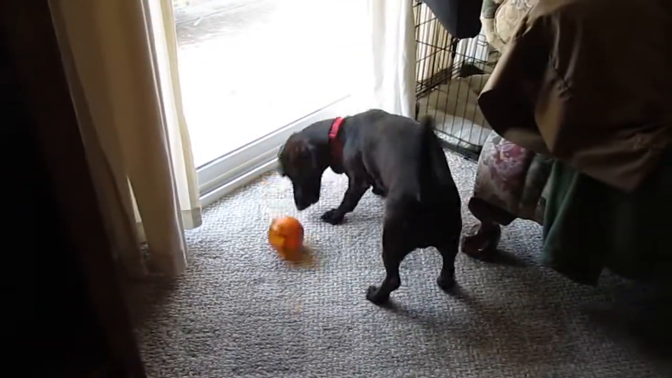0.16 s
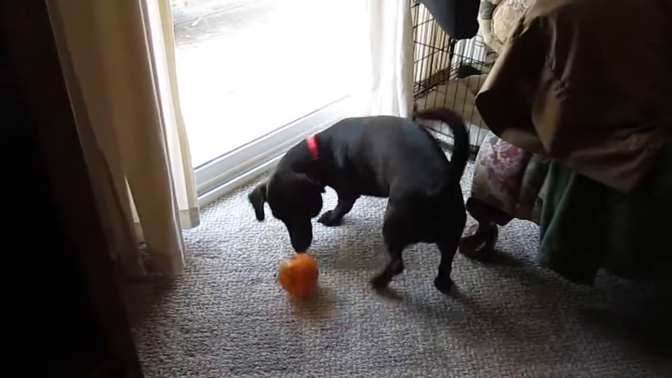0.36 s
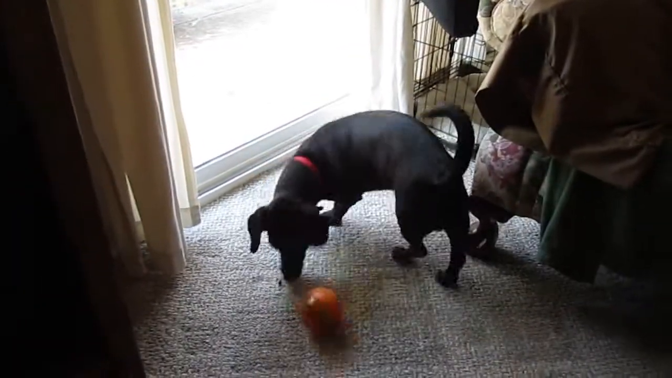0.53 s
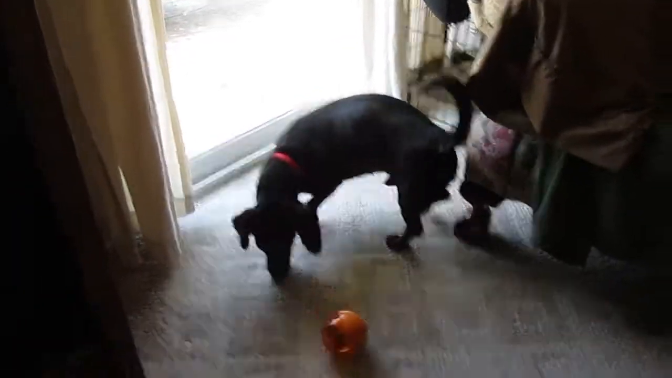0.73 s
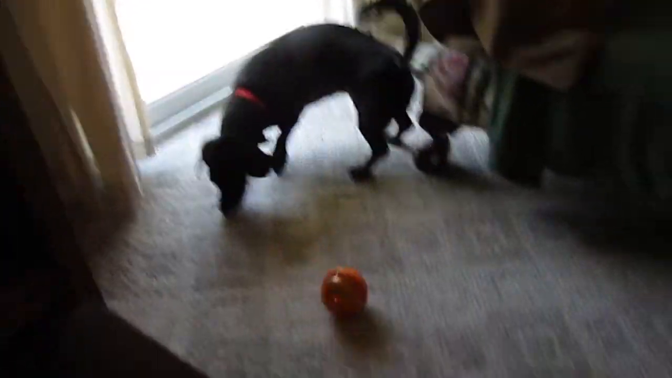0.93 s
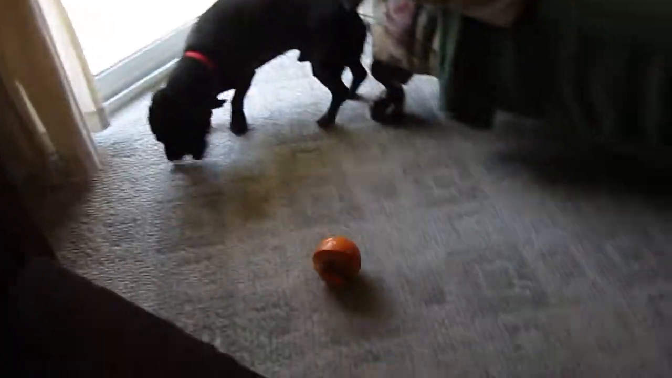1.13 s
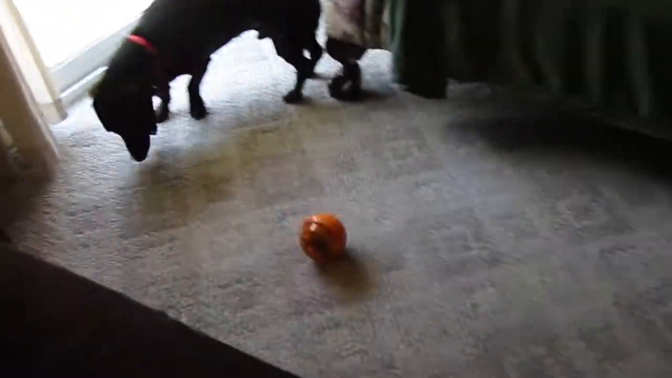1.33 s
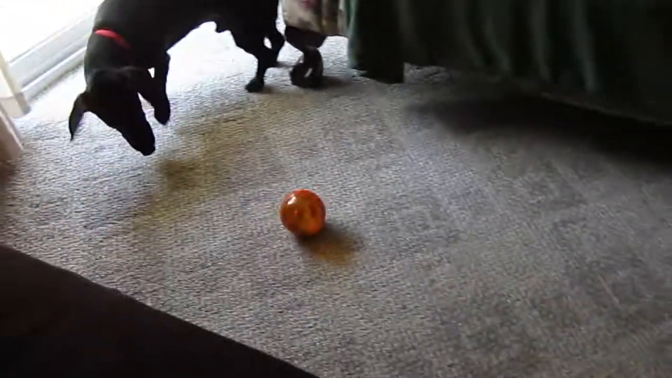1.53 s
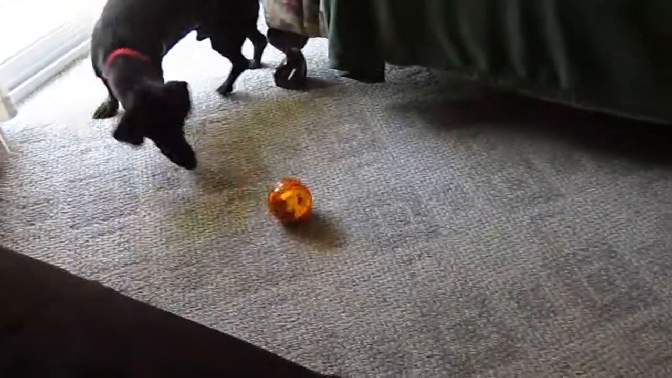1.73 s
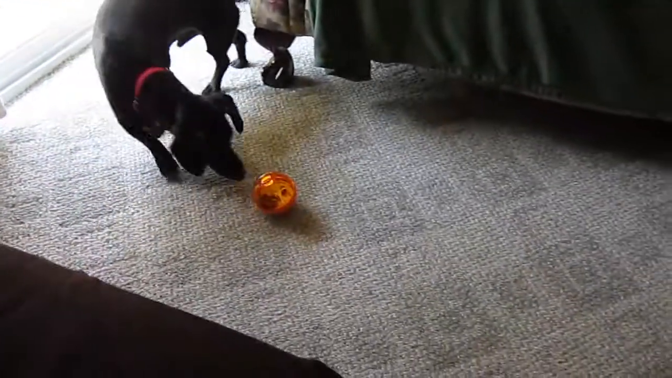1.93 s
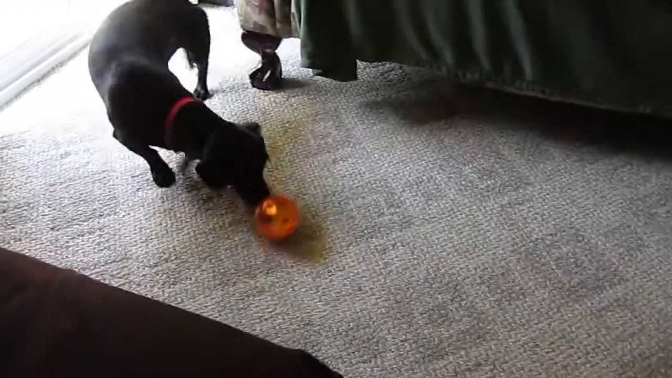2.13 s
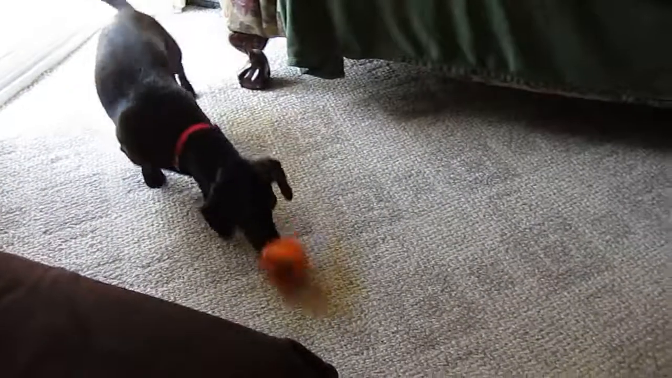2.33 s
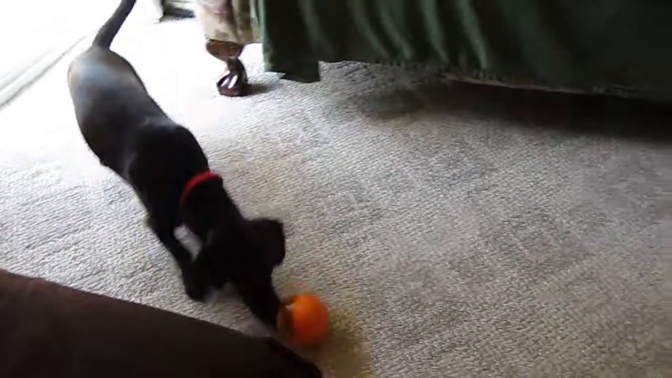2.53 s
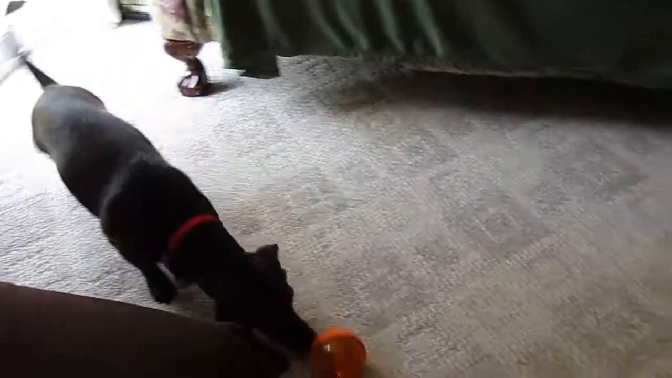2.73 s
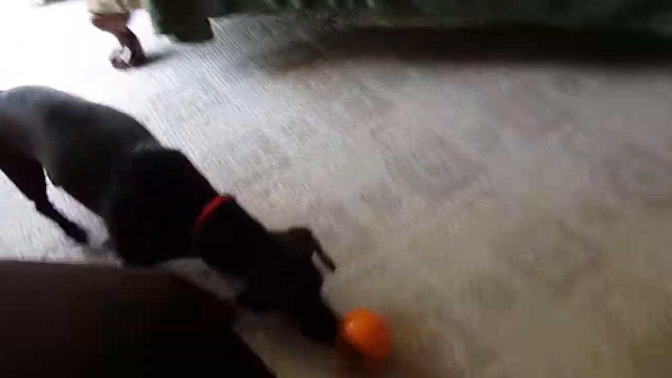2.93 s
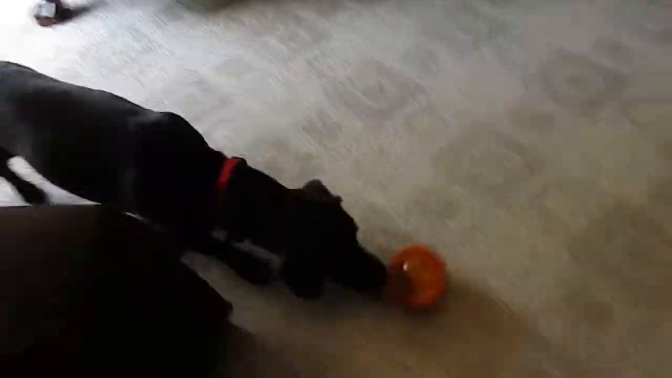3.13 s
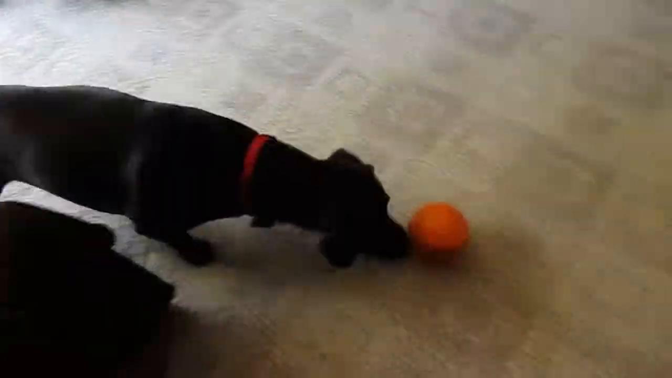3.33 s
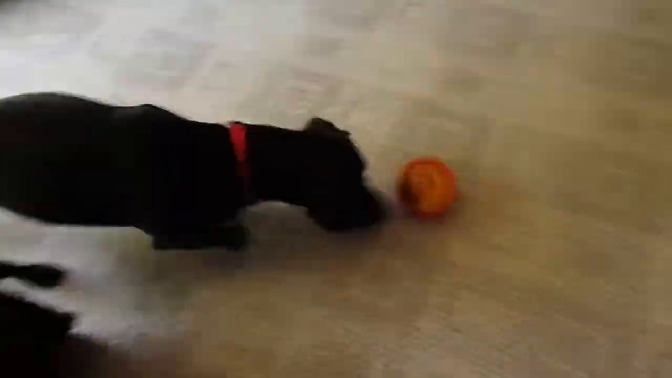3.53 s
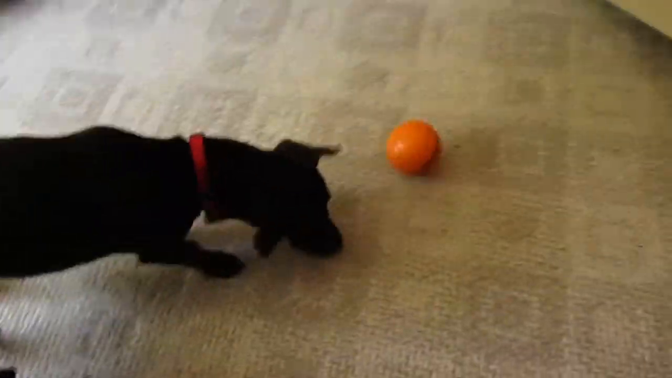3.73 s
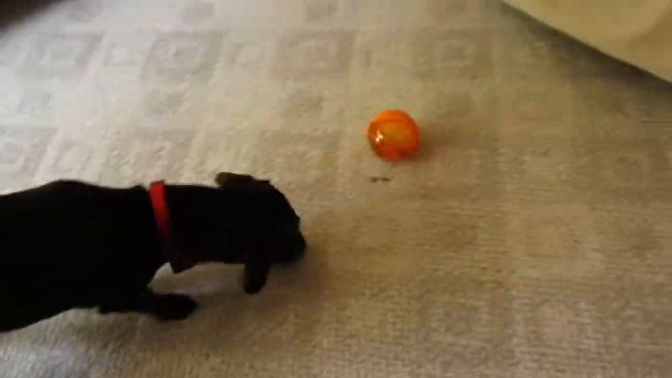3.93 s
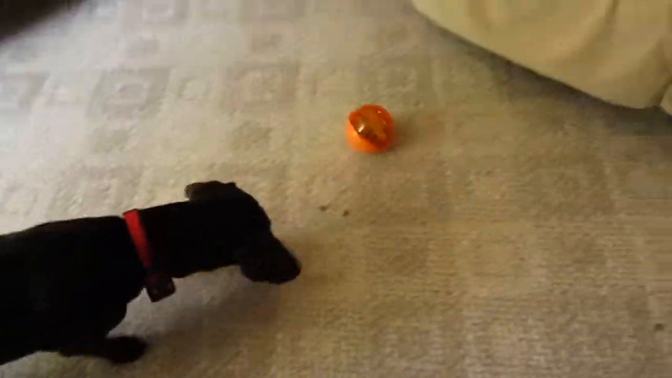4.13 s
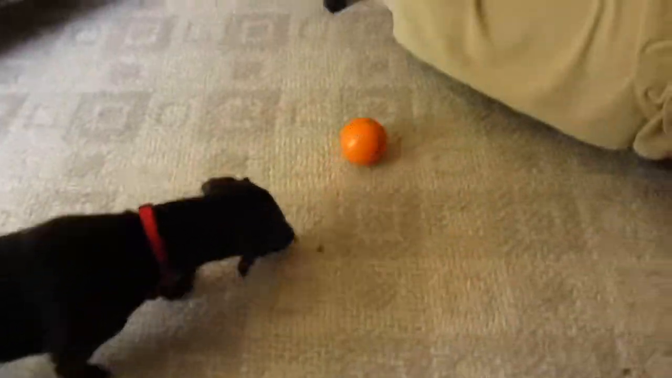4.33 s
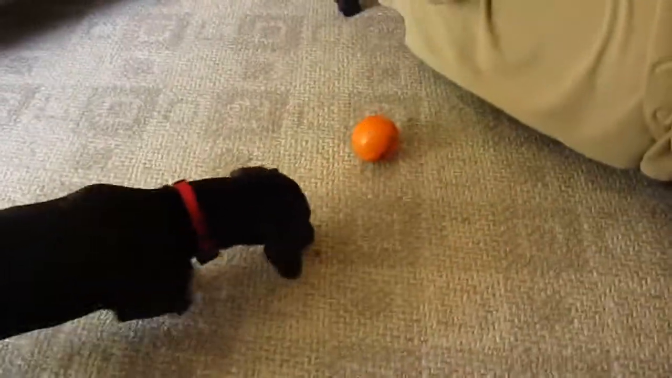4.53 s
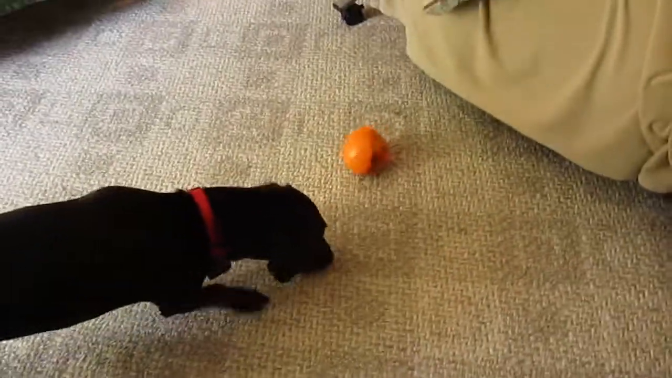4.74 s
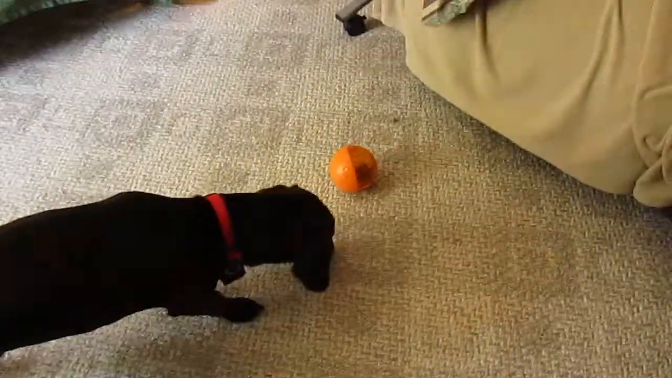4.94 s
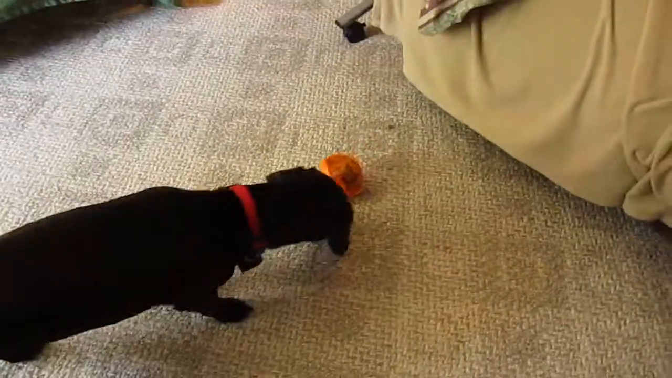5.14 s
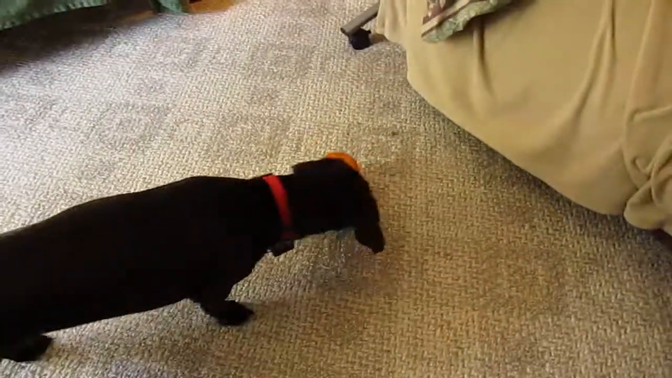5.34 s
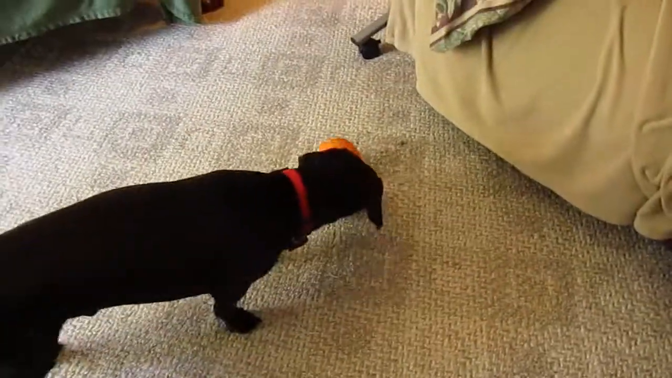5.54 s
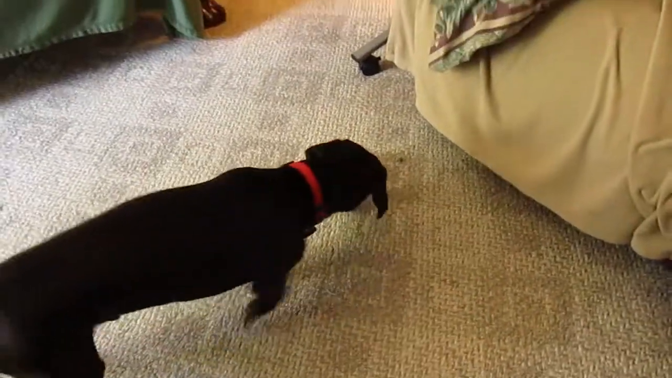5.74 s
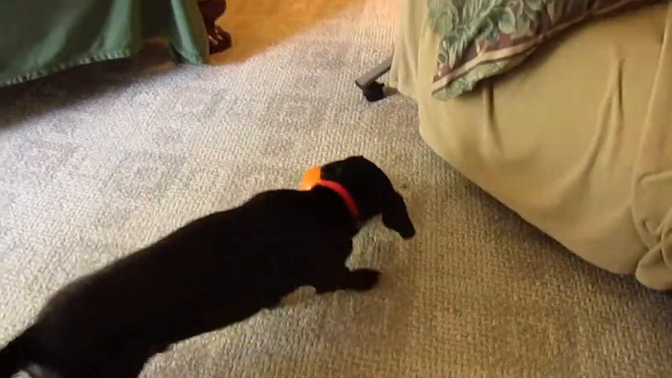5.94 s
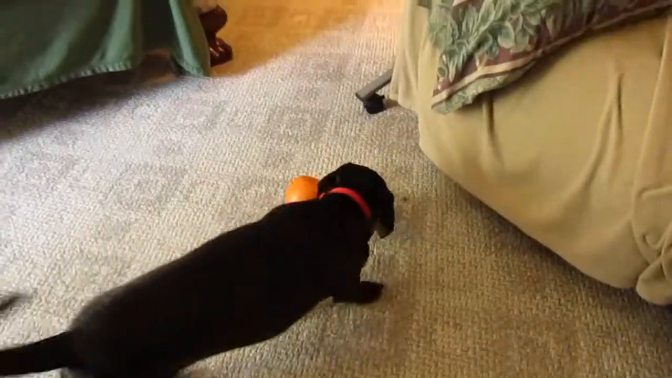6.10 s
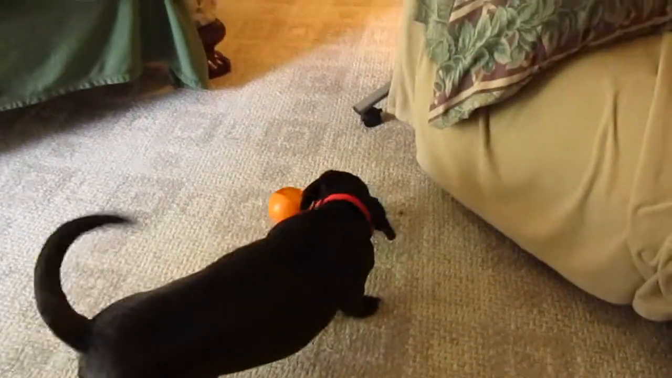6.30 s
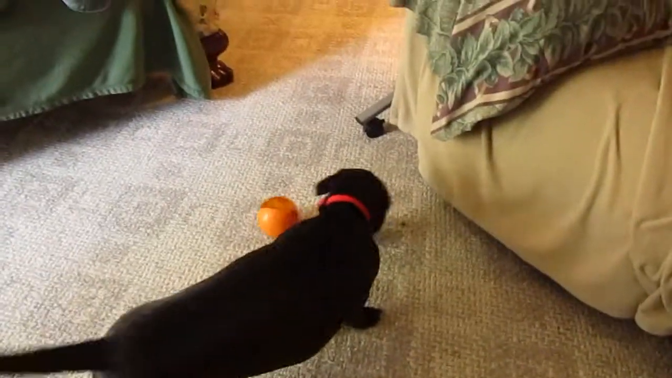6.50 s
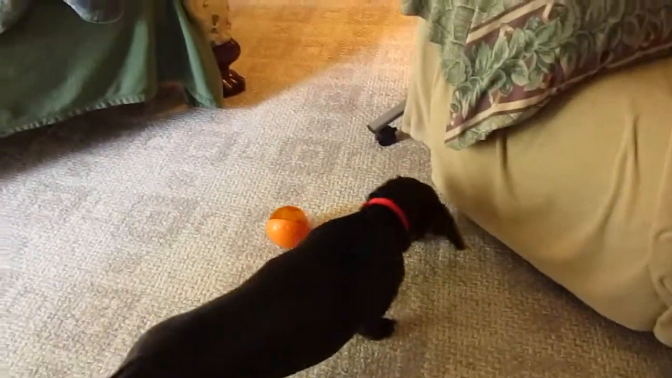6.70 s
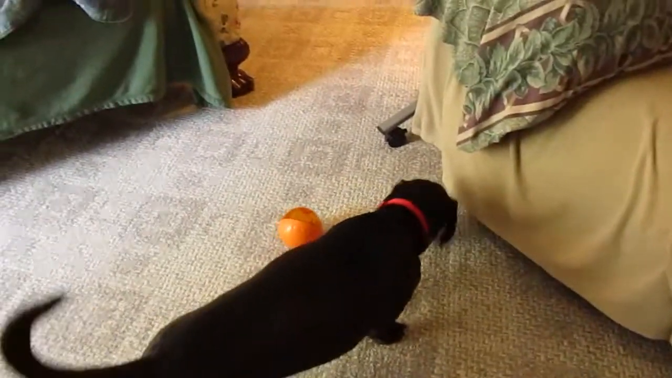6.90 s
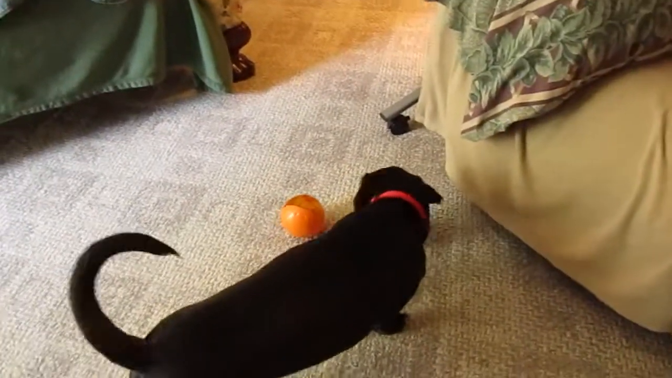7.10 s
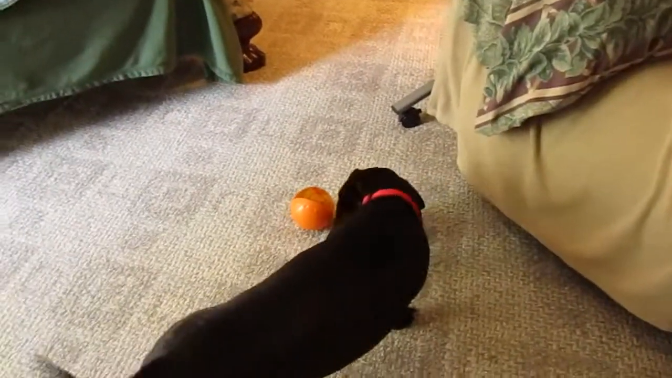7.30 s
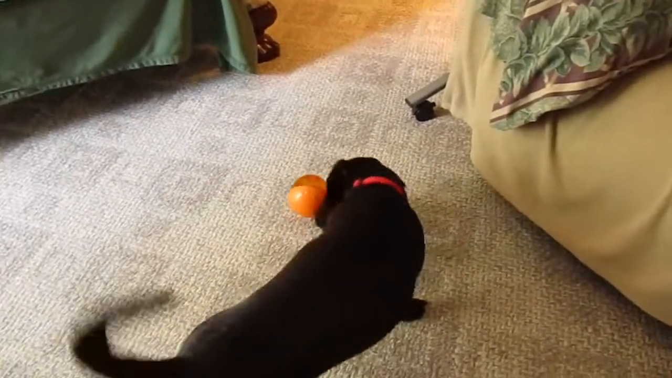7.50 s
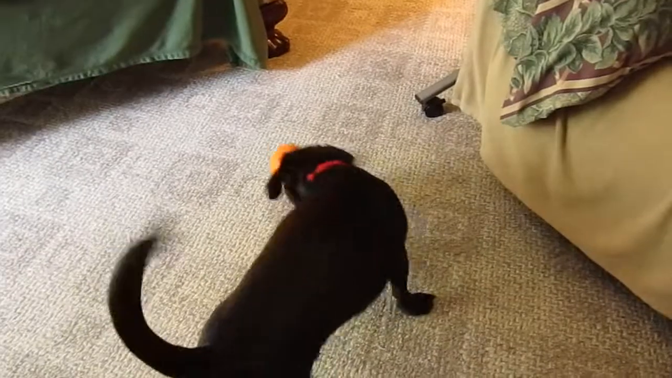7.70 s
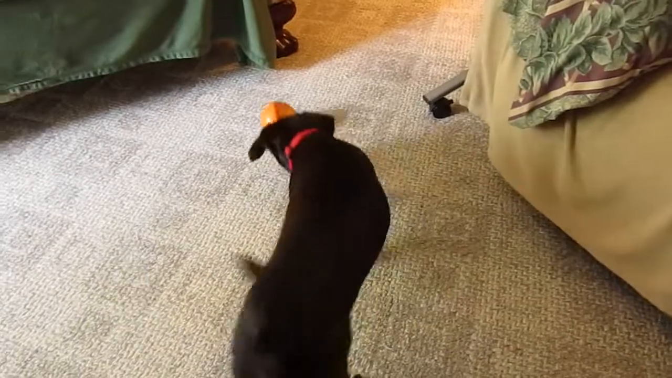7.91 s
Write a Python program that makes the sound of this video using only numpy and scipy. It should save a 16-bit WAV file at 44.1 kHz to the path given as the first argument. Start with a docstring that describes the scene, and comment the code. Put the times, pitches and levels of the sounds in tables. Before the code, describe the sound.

Dry kibble rattles and clicks inside a hollow plastic ball as a dog noses it over carpet, then quiets to faint chewing ticks.

```python
"""Dog with a treat ball

A dog noses a hollow plastic treat ball across a living-room carpet, heard from close by.
Dry kibble tumbles and clicks on the shell: showers of short noise bursts and pings at random moments.
Pushes and bumps boom softly through low ringing modes; knocks and crunches of the dog are coloured noise.
A small furnished room answers with fading noise echoes, over the low steady rush of the house."""
import sys
import numpy as np
from scipy import signal
from scipy.fft import rfft, irfft, next_fast_len
from scipy.io import wavfile
from scipy.ndimage import uniform_filter1d

SR = 44100
rng = np.random.default_rng(int(sys.argv[2]) if len(sys.argv) > 2 else 0)


def put_to_file(sound):
    """Save the sound as 16-bit audio at rate SR, in the file named by the first command-line argument."""
    columns = np.atleast_2d(sound).T  # one column per channel
    safe = np.clip(columns, -1, 1)
    whole_steps = np.round(safe * 32767)
    wavfile.write(sys.argv[1], SR, whole_steps.astype(np.int16))


N = 355446  # length of the scene [samples]
RING_TIME = np.arange(4096) / SR  # time inside one short contact sound [s]


def amp(db):
    """Turn decibels into a gain."""
    return 10 ** (np.asarray(db) / 20)


def unit(x):
    """Scale x to an rms of 1."""
    return x / np.sqrt(np.mean(x ** 2) + 1e-20)


def along(points, hz):
    """Read a curve of (frequency, value) points, with straight lines on a log frequency axis."""
    f, v = np.transpose(points)
    return np.interp(np.log(hz + 1), np.log(f), v)


def filtered(x, response):
    """Multiply the spectrum of x by a response that depends on frequency."""
    size = x.shape[-1]
    padded = next_fast_len(size + SR // 4)
    hz = np.fft.rfftfreq(padded, 1 / SR)
    return irfft(rfft(x, padded) * response(hz), padded)[..., :size]


def coloured(x, spectrum):
    """Colour a short sound with a minimum-phase filter, so that its attack stays sharp."""
    size = len(x)
    gain = amp(along(spectrum, np.fft.rfftfreq(size, 1 / SR)))
    # folding the cepstrum forward in time keeps the filter from sounding before the attack
    cepstrum = irfft(np.log(gain))
    cepstrum[1:size // 2] *= 2
    cepstrum[size // 2 + 1:] = 0
    return irfft(rfft(x) * np.exp(rfft(cepstrum)))


def fade(t60, t=RING_TIME):
    """Free decay that falls by 60 dB in t60 seconds."""
    return np.exp(-np.log(1000) * t / t60)


def burst(t60):
    """A dying puff of noise."""
    return rng.standard_normal(len(RING_TIME)) * fade(t60)


def ring(modes, spread_db, detune):
    """Damped modes, with new strengths and slightly new pitches for each point of contact."""
    total = 0
    for hz, db, t60 in modes:
        strength = amp(db + spread_db * rng.normal())
        pitch = hz * (1 + detune * rng.normal())
        total = total + strength * fade(t60) * np.sin(2 * np.pi * pitch * RING_TIME)
    return total


def add(track, s, db, sound):
    """Lay a sound into the track at a time and a peak level."""
    part = track[max(round(s * SR), 0):][:len(sound)]
    part += amp(db) * sound[:len(part)] / np.abs(sound).max()


def shower(level_db, rate, spread_db, contact, count):
    """Random contacts of uneven size on count spots, with the loudness evened out around a given level."""
    at = np.flatnonzero(rng.random(N) < rate / SR)
    loudness = amp(spread_db * np.clip(rng.standard_normal(N)[at], -2, 2))
    sizes = loudness * rng.choice([-1, 1], N)[at]
    spots = rng.integers(count, size=N)[at]
    grains = np.zeros(N)
    for spot in range(count):
        hits = np.bincount(at, sizes * (spots == spot), N)
        grains += signal.oaconvolve(hits, unit(contact()))[:N]
    grains = unit(grains)
    # neighbouring contacts share the energy of the motion
    power = uniform_filter1d(uniform_filter1d(grains ** 2, size=1800), size=1800)
    return amp(level_db) * grains / np.sqrt(np.abs(power) + 0.013)


def strokes(rows, rise_db_per_s, fall_db_per_s):
    """Level curve in dB of (start, length, level) movements: each swells, holds and dies away."""
    t = np.arange(N) / SR
    level = np.full(N, -90.0)
    for s, length, db in rows:
        rise = rise_db_per_s * np.maximum(s - t, 0)
        fall = fall_db_per_s * np.maximum(t - s - length, 0)
        level = np.maximum(level, db - rise - fall)
    return level


def stereo(pair, side):
    """Spread two unrelated noises as left and right: one is shared, the other is their difference."""
    difference = filtered(pair[1], lambda hz: amp(along(side, hz)))
    return np.array([pair[0] + difference, pair[0] - difference])


# colour of the house's background: (frequency [Hz], level [dB per Hz])
HOUSE_COLOUR = [(25, -20.5), (60, -11.5), (100, -4), (200, 0.5), (300, -2.5), (450, -11), (700, -14.5),
                (1200, -18), (3000, -28), (3900, -35), (5300, -29.5), (8000, -38.5), (15000, -62)]
# how wide that background is: (frequency [Hz], side against middle [dB])
HOUSE_WIDTH = [(40, 2.5), (150, -3.5), (400, 2), (1200, -1), (5000, -3), (12000, 2)]


def hum():
    """The steady low rush of the house: coloured noise."""
    noise = filtered(rng.standard_normal((2, N)), lambda hz: amp(along(HOUSE_COLOUR, hz)))
    return amp(-42.0) * unit(stereo(noise, HOUSE_WIDTH))


# how long the room rings: (frequency [Hz], time to fall by 60 dB [s])
ROOM_DECAY = [(200, 0.26), (1200, 0.2), (5000, 0.13), (12000, 0.07)]
# how wide the echoes are: (frequency [Hz], side against middle [dB])
ROOM_WIDTH = [(250, -20.5), (600, -9.5), (1200, -33), (2500, -45), (5000, -4.5), (8000, -2.5), (13000, 5.5)]


def room_tail():
    """Diffuse reflections as fading noise; the treble dies first in carpet and curtains."""
    hz, t, z = signal.stft(rng.standard_normal((2, SR // 3)), SR, nperseg=256)
    decay = fade(along(ROOM_DECAY, hz)[:, None], t)
    tail = signal.istft(z * decay, SR, nperseg=256)[1]
    # the echoes build up over the first few milliseconds
    tail = tail * (1 - fade(0.0064, np.arange(tail.shape[1]) / SR))
    return stereo(tail / np.linalg.norm(tail[0]), ROOM_WIDTH)


def room(x, count):
    """The room's answer; its reflections change at each of count places along the ball's path."""
    wet = np.zeros((2, N + SR))
    for at in np.array_split(np.arange(N), count):
        answer = signal.fftconvolve(x[at][None], room_tail(), axes=1)
        wet[:, at[0]:at[0] + answer.shape[1]] += answer
    # one clear echo, 0.01 s late
    near_wall = filtered(x, lambda hz: np.exp(-2j * np.pi * hz * 0.01))
    return amp(-6.5) * wet[:, :N] + amp(-17.5) * near_wall


CHEW_START_S, CHEW_END_S = 4.5, 7.7  # the dog eats what has fallen out
CHEW_PER_S, CHEW_DB, CHEW_SPREAD_DB = 11, -42, 6.5  # average rate, typical peak level and its scatter
CHEW_TRIES = 80  # possible ticks, of which a random share sounds
# colour of small ticks of teeth and crumbs: (frequency [Hz], level [dB per Hz])
CRUMB_COLOUR = [(200, -23), (800, 2), (1300, -2), (3000, -2), (4000, -14), (5500, -9), (9000, -15),
                (12000, -24), (15000, -42)]


def chewing():
    """Faint ticks of teeth and crumbs, short noise puffs at random moments while the dog eats."""
    track = np.zeros(N)
    length = CHEW_END_S - CHEW_START_S
    for place, keep, size in np.c_[rng.random((CHEW_TRIES, 2)), rng.standard_normal(CHEW_TRIES)]:
        tick = coloured(burst(0.007), CRUMB_COLOUR)
        if keep < CHEW_PER_S * length / CHEW_TRIES:
            add(track, CHEW_START_S + place * length, CHEW_DB + CHEW_SPREAD_DB * size, tick)
    return track


KNOCK_T60_S, SCUFF_T60_S, SCUFF_DB = 0.0049, 0.15, -15  # the blow, and the scuff that goes with it
# hard knocks of snout and teeth: (time [s], level [dB], centre of the resonance [Hz])
SNOUT_KNOCKS = [(1.544, -24, 560), (2.078, -17, 1100), (2.087, -23, 1400), (4.384, -23, 550),
                (4.861, -29, 1600), (5.354, -25, 1100), (5.585, -27, 600), (7.457, -24, 1650),
                (7.462, -29, 700), (7.508, -28, 550), (7.516, -22, 750)]
# the dog cracks a piece between its teeth: (time [s], level [dB])
TEETH_CRUNCHES = [(1.730, -31), (1.762, -30), (1.795, -32), (1.82, -32), (1.866, -28), (2.005, -38),
                  (4.592, -34), (5.66, -30), (5.778, -32)]
# colour of a crunch in the dog's mouth: (frequency [Hz], level [dB per Hz])
MOUTH_COLOUR = [(400, -24), (1000, -17), (1230, 1.5), (1370, -6.5), (1600, -21.5), (2900, -30), (3750, -20),
                (4400, -23), (5200, -25), (8500, -27), (13000, -50)]
# colour of rubbing and knocking, also used for the ball: (frequency [Hz], level [dB per Hz])
RUB_COLOUR = [(150, -29.5), (400, -2), (700, -2), (980, -1.5), (1230, 2), (1600, -2.5), (2400, -10),
              (3250, -10), (3900, -24.5), (9000, -37), (14000, -58)]


def dog():
    """Snout, paws and teeth knock dully; chewed kibble snaps inside the mouth."""
    track = np.zeros(N)
    for s, db, hz in SNOUT_KNOCKS:
        # one broad resonance, a quick blow and a short scuff
        resonance = [(hz / 4, -16), (hz / 2, -7), (hz, 0), (hz * 2, -8), (hz * 8, -20)]
        blow = burst(KNOCK_T60_S) + amp(SCUFF_DB) * burst(SCUFF_T60_S)
        add(track, s, db, coloured(coloured(blow, RUB_COLOUR), resonance))
    for s, db in TEETH_CRUNCHES:
        add(track, s, db, coloured(burst(0.047), MOUTH_COLOUR))
    return track


THUD_SPREAD = 0.095  # the pitch of a bump differs with the spot that meets the floor
# the air and wall of the ball at low pitch: (frequency [Hz], level [dB], time to fall by 60 dB [s])
HOLLOW_MODES = [(295.8, 2.5, 0.12), (237, -9.5, 0.24), (322, -4.5, 0.045)]
# colour of a cushioned bump before its pitch is varied: (frequency [Hz], level [dB per Hz])
THUD_COLOUR = [(60, -40), (160, -21), (270, 0), (380, -1), (520, -6), (700, -9), (1200, -24), (4000, -55)]


def thud():
    """The carpet cushions a push, so mainly the hollow low modes sound."""
    pitch = np.exp(THUD_SPREAD * rng.normal())
    colour = [(hz * pitch, db) for hz, db in THUD_COLOUR]
    boom = ring(HOLLOW_MODES, spread_db=2, detune=.04)
    return coloured(burst(.04) + amp(-21) * boom, colour)


# soft pushes and bumps of the ball: (time [s], level [dB])
SOFT_BUMPS = [(0.008, -19), (0.166, -19), (0.333, -27), (0.515, -24), (2.193, -22), (2.531, -21),
              (2.843, -19), (2.915, -21), (3.11, -23), (3.439, -19), (3.492, -18), (3.943, -22),
              (4.03, -24), (4.48, -31), (5.302, -31), (6.011, -29), (7.763, -24)]


def bumps():
    """The nose shoves the ball, and it bumps over its own opening: single hollow thuds."""
    track = np.zeros(N)
    for s, db in SOFT_BUMPS:
        add(track, s, db, thud())
    return track


# the dog's paw swipes across the shell: (time [s], half length [s], level [dB])
PAW_SWIPES = [(0.1, 0.14, -42), (2.343, 0.02, -34), (4.288, 0.048, -32.5), (7.874, 0.064, -31)]
# colour of a paw swipe: (frequency [Hz], level [dB per Hz])
SWIPE_COLOUR = [(500, -20), (900, -3.5), (2900, 4.5), (4000, -29), (7000, 6), (10000, -9.5), (14000, -24),
                (16000, -30)]


def swipes():
    """A paw swipes across the plastic shell: dense, very short noise contacts that swell and fade."""
    t = np.arange(N) / SR
    swell = sum(amp(db) * np.exp(-((t - s) / half) ** 2) for s, half, db in PAW_SWIPES)
    rasp = shower(0, rate=1500, spread_db=6, contact=lambda: coloured(burst(.003), SWIPE_COLOUR), count=12)
    return swell * rasp


# the shell's high modes: (frequency [Hz], level [dB], time to fall by 60 dB [s])
SHELL_MODES = [(4480, 13.5, 0.015), (4860, -1, 0.033), (5200, -3, 0.12), (5940, 3, 0.038), (6560, 5, 0.059),
               (7560, 5, 0.012), (8960, 1, 0.046), (9800, 11, .025), (11750, -20, 0.046)]
# colour of kibble on plastic: (frequency [Hz], level [dB per Hz])
KIBBLE_COLOUR = [(500, -55.5), (2500, -21), (3900, -20), (4500, -10), (5200, -2), (6600, -4.5),
                 (8000, -7.5), (10000, -19.5), (11200, -27), (13000, -28.5), (15000, -81)]


def kibble_hit(hz):
    """A dry piece cracks on the plastic: its own brief ping, and the shell rings on."""
    shell = ring(SHELL_MODES, spread_db=4, detune=.005)
    ping = amp(-2) * fade(.0035) * np.sin(2 * np.pi * hz * RING_TIME)
    return coloured(burst(.004) + ping + amp(-32) * shell, KIBBLE_COLOUR)


CLICK_HZ, CLICK_SPREAD = 5870, 0.18  # middle pitch of a piece, and its scatter from piece to piece
# first contact, rebound, and the wall's dull answer [dB against the table]
CLICK_DB, CHATTER_DB, TOCK_DB = -1, -6, -16
# single pieces hitting the shell hard: (time [s], level [dB])
HARD_CLICKS = [(0.1181, -11), (0.6394, -11), (0.7317, -15), (0.9762, -11), (1.0725, -7), (1.2984, -16),
               (2.0792, -17), (2.135, -16), (2.2558, -15), (2.3226, -13), (2.4884, -17), (2.6214, -12),
               (2.6404, -10), (2.7392, -14), (2.8005, -9), (2.9063, -1), (2.9751, -8), (3.1862, -10),
               (3.243, -7), (3.266, -9), (3.466, -6), (3.475, -5), (3.4984, -5), (3.6456, -12), (3.681, -7),
               (3.6925, -5), (3.7249, -5), (3.9114, -6), (3.922, 0), (3.9684, -3), (4.1789, -8),
               (4.1974, -13), (4.2457, -9), (4.2622, -8), (4.2827, -2), (4.3046, -2), (4.3184, -6),
               (4.3226, -6), (4.356, -11), (4.3829, -12), (4.5067, -23), (4.7292, -17), (4.8609, -16),
               (5.0394, -18), (5.4096, -22), (5.6501, -20), (6.0511, -16), (6.0576, -16), (6.1983, -18),
               (6.4847, -16), (6.8099, -31), (7.0683, -37), (7.8214, -12), (7.8506, -10)]


def clicks():
    """Pieces drop across the inside of the ball, knock its wall and chatter once more just after landing."""
    track = np.zeros(N)
    for (s, db), chance in zip(HARD_CLICKS, rng.random(len(HARD_CLICKS))):
        hz = CLICK_HZ * np.exp(CLICK_SPREAD * rng.normal())
        rebound_s = s + .0006 + .002 * chance
        add(track, s, db + CLICK_DB, kibble_hit(hz))
        add(track, rebound_s, db + CHATTER_DB, kibble_hit(hz))
        add(track, s, db + TOCK_DB, coloured(burst(0.0057), RUB_COLOUR))
    return track


SHOVE_DB_PER_S, COAST_DB_PER_S = 555, 56  # the ball gets going at once and is slowly braked by the pile
SPILL_DB_PER_S, SETTLE_DB_PER_S = 288, 148.5  # a tumble swells and dies away
SHUFFLE_DB = -56  # lowest rubbing level: paws on the carpet while the ball lies still
# loose pieces: their level in a brisk roll, dB per dB of rubbing, and the rubbing level of that roll
TRICKLE_DB, TRICKLE_GROWS, BRISK_DB = -40.5, 1.61, -38.5
# density of the rattle at a given level, and how strongly it follows the level
CONTACTS_PER_S, CONTACTS_GROW, CONTACTS_AT_DB = 900, .4, -29.5
TINK_DB = -16.5  # the odd large piece in any tumble, against the rattle
# the dog drives the ball, then lets it coast: (start [s], length [s], rubbing level [dB], drumming level [dB])
BALL_PUSHES = [(0.0, 0.42, -37, -43), (0.56, 0.31, -37.5, -42), (0.89, 0.24, -35, -40),
               (1.235, 0.28, -41.5, -44), (2.076, 0.29, -36.5, -35.5), (2.553, 0.33, -38.5, -36.5),
               (2.85, 0.53, -35, -33.5), (3.438, 0.089, -34, -31), (3.715, 0.034, -32.5, -33),
               (3.964, 0.065, -35, -37.5), (4.204, 0.11, -37.5, -41), (5.328, 0.38, -43, -46),
               (5.977, 0.17, -40.5, -44.5), (6.48, 0.052, -43, -50), (7.762, 0.11, -34, -35)]
# the heap of kibble rides up the wall and tumbles down: (start [s], length [s], level [dB])
KIBBLE_TUMBLES = [(0.04, 0.09, -27.5), (0.3, 0.051, -29), (0.41, 0.061, -33.5), (0.59, 0.066, -27.5),
                  (0.73, 0.18, -29.5), (0.93, 0.17, -25.5), (1.24, 0.081, -29), (1.38, 0.029, -33.5),
                  (1.52, 0.094, -40.5), (2.1, 0.038, -35.5), (2.27, 0.1, -29.5), (2.54, 0.15, -27.5),
                  (2.77, 0.25, -27), (3.06, 0.028, -23.5), (3.22, 0.12, -27), (3.475, 0.031, -20),
                  (3.715, 0.041, -23), (3.94, 0.061, -21), (4.23, 0.092, -29.5), (4.45, 0.054, -47.5),
                  (5.08, 0.28, -55), (5.41, 0.08, -45.5), (5.63, 0.031, -37), (6.07, 0.15, -36.5),
                  (6.46, 0.11, -42), (6.72, 0.031, -51.5), (7.81, 0.069, -26), (7.98, 0.033, -27)]
# runs of large pieces that tink at a lower pitch: (start [s], length [s], level [dB])
LARGE_RUNS = [(0.59, 0.041, -38.5), (2.26, 0.017, -39.5), (2.885, 0.025, -34), (3.26, 0.13, -34.5)]


def rolling_ball():
    """Kibble tumbles and slides inside the ball; the louder the rattle, the denser the contacts."""
    pushes = np.array(BALL_PUSHES)
    rub_db = np.maximum(strokes(pushes[:, [0, 1, 2]], SHOVE_DB_PER_S, COAST_DB_PER_S), SHUFFLE_DB)
    drum_db = strokes(pushes[:, [0, 1, 3]], SHOVE_DB_PER_S, COAST_DB_PER_S)
    trickle_db = TRICKLE_DB + TRICKLE_GROWS * (rub_db - BRISK_DB)
    tumble_db = strokes(KIBBLE_TUMBLES, SPILL_DB_PER_S, SETTLE_DB_PER_S)
    rattle_db = np.maximum(tumble_db, trickle_db)
    rate = CONTACTS_PER_S * amp(CONTACTS_GROW * (rattle_db - CONTACTS_AT_DB))
    # the heap slides in small avalanches
    slides = amp(5.3 * unit(uniform_filter1d(rng.standard_normal(N), size=700)))
    # now and then a large piece gives a lower, rounder tink
    large_db = strokes(LARGE_RUNS, SPILL_DB_PER_S, SETTLE_DB_PER_S)
    tink_db = np.maximum(rattle_db + TINK_DB, large_db)

    def piece():
        return kibble_hit(5700 * np.exp(0.12 * rng.normal()))

    def large_piece():
        return ring([(3850, 0, .007)], spread_db=0, detune=.08)

    def rub():
        return coloured(burst(0.011), RUB_COLOUR)

    # each layer sits a fixed step below its level curve, except the tinks
    rattle = shower(rattle_db - 1.0, rate * slides, 6.54, piece, count=40)
    tinks = shower(tink_db, rate / 12, 6, large_piece, count=16)
    rubbing = shower(rub_db - 3.0, rate + 150, 5.4, rub, count=20)
    drumming = shower(drum_db - 4.5, rate=110, spread_db=4, contact=thud, count=12)
    return rattle + tinks + rubbing + drumming


def scene():
    """Ball and dog close by, in the room; the second channel is slightly louder."""
    direct = rolling_ball() + swipes() + clicks() + bumps() + dog() + chewing()
    return (direct + room(direct, count=80) + hum()) * amp([[-.4], [.4]])


TOP_HZ = 15600  # upper limit of the band


def record(dry):
    """Clip peaks at full scale, then keep nothing at or above the band limit."""
    return filtered(np.clip(dry, -1, 1), lambda hz: hz < TOP_HZ)


dry = scene()
out = record(dry)
put_to_file(out)
```